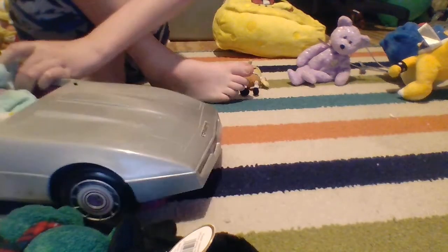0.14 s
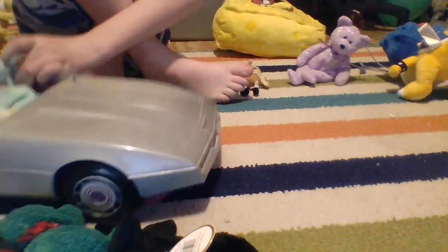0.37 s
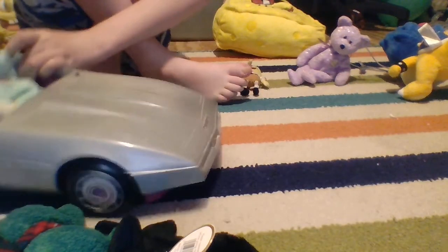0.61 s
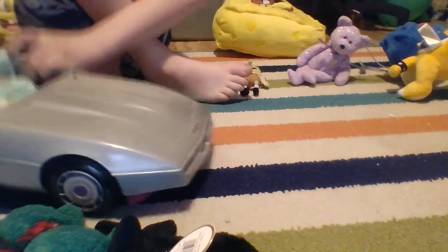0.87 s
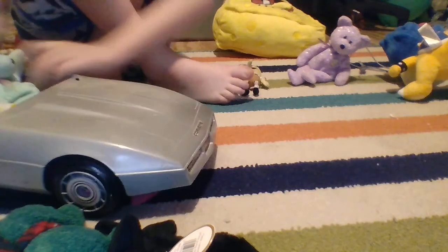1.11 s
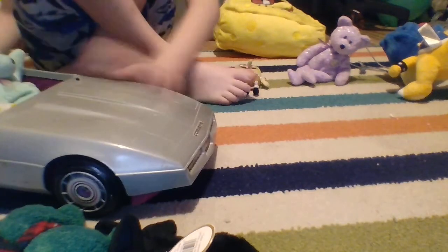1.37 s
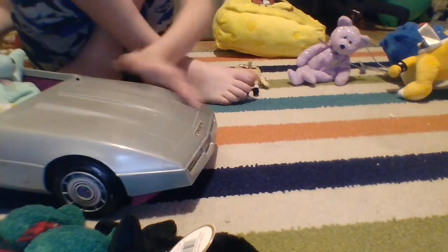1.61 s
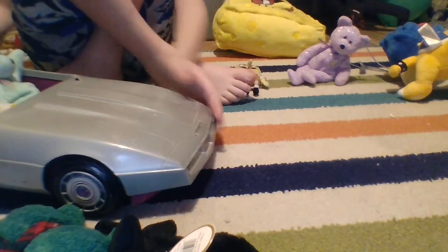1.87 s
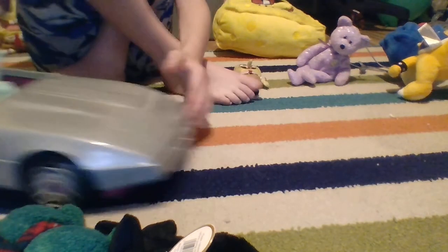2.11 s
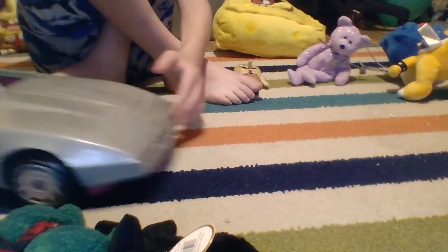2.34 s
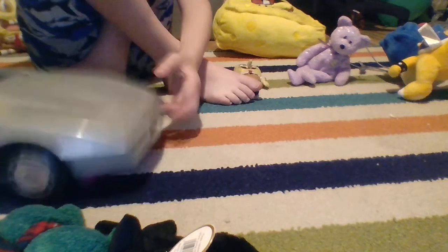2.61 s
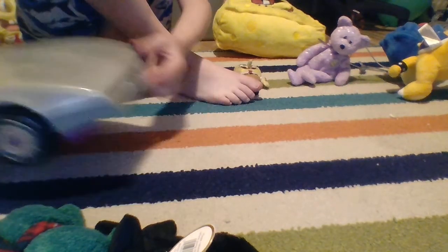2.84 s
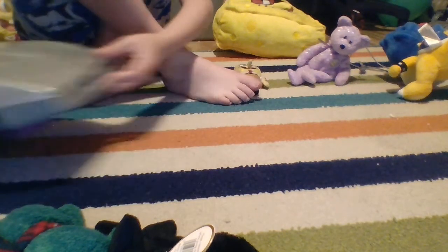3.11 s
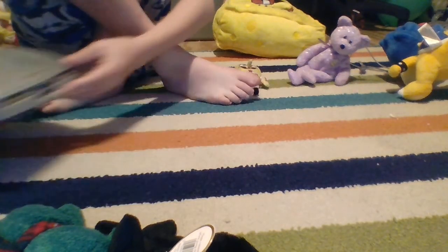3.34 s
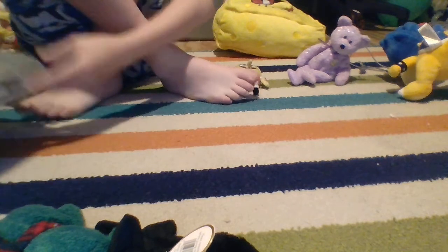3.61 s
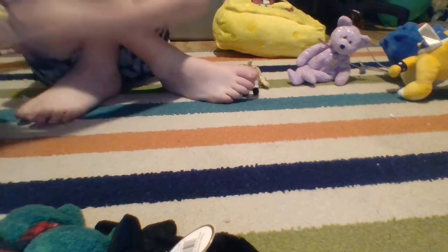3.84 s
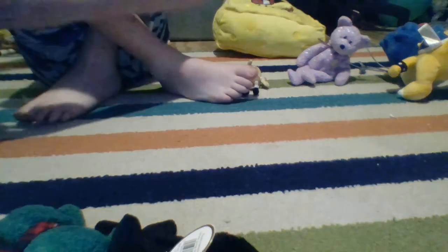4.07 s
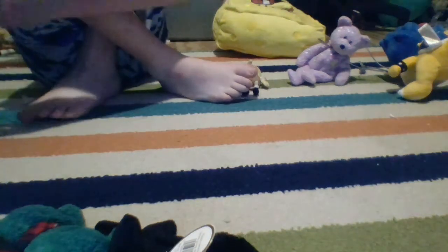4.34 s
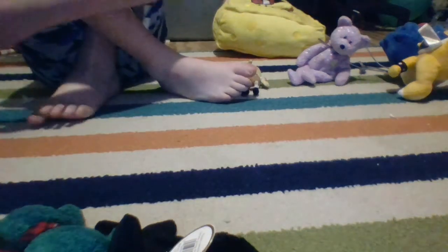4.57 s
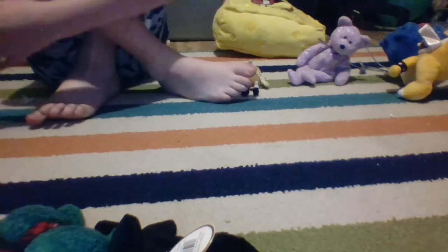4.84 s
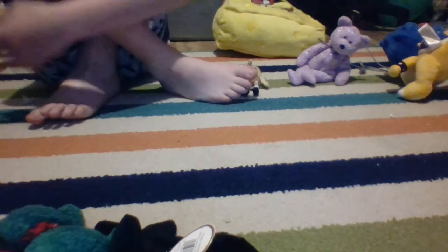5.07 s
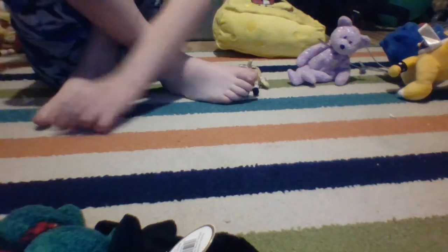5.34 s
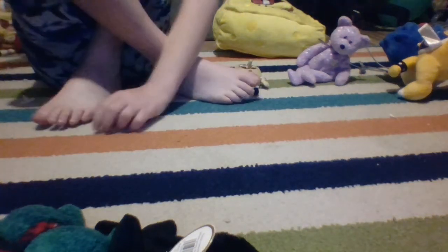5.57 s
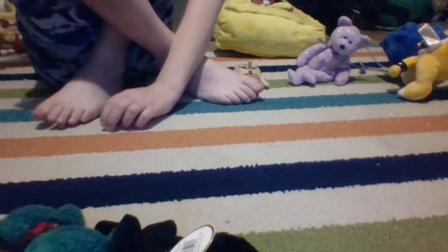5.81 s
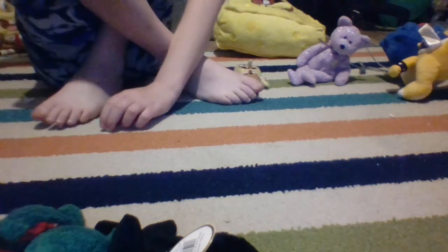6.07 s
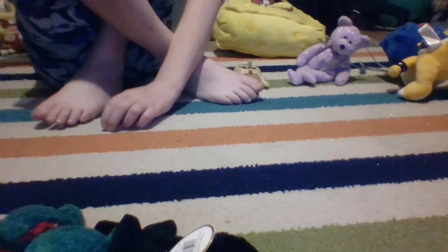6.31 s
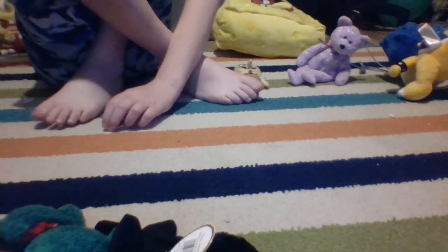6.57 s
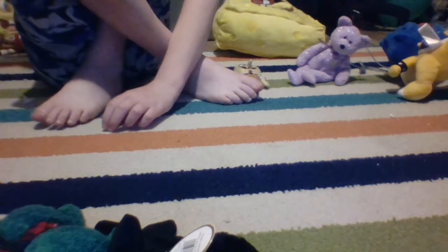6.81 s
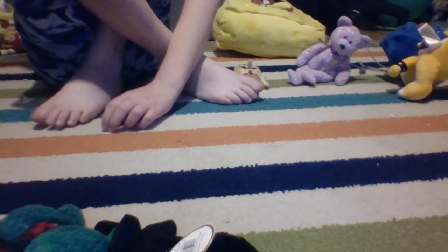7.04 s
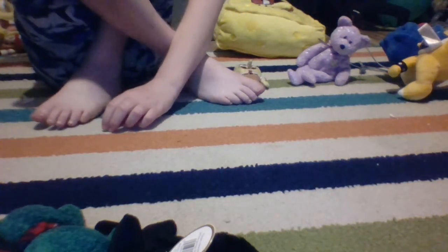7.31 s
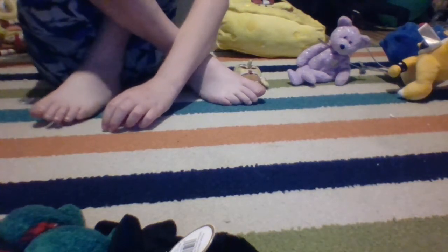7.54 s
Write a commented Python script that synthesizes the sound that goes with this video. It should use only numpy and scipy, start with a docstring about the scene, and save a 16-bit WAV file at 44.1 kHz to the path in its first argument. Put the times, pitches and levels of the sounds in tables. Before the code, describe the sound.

A quiet small room, heard close in stereo, with faint hum and hiss. From 0 to 0.45 s a hollow plastic toy car rolls over carpet: grainy low-mid rumble, rubbing, a thin high wheel whirr and tiny squeaks. At 0.47-0.62 s come rapid hard hollow knocks with a brushy scrape, then a louder clatter at 0.8-0.85 s. From 1 to 2.6 s it is nearly quiet: faint finger brushes and soft low puffs of moving air. Around 2.7-3.03 s the lifted car clacks several times. Slight rubs follow, dull knocks at 3.8 s, then strong clacks at 4.2-4.3 s, a rough stuttering creak at 4.4-4.57 s, and sharp clacks at 4.67-4.75 s. Light taps thin out to 5.5 s, with small bumps near 6-6.2 s. After near silence, soft hollow knocks, a faint squeak and brushing close 7.25-7.6 s.

```python
"""Wheels whirr and plastic rubs as a hollow toy car rolls in over carpet in a quiet room; hard knocks follow.
The car is lifted, turned in the hands and set down: blows and rubs excite decaying modes of its shell,
stick-slip creaks and squeaks, and strokes on the pile hiss as dense random grains.
Quick moves puff turbulent air at two close microphone ports, over faint hum and hiss."""
import sys
import numpy as np
from scipy import signal
from scipy.fft import rfft, irfft
from scipy.io import wavfile
from scipy.ndimage import uniform_filter1d

SR = 44100
rng = np.random.default_rng(int(sys.argv[2]) if len(sys.argv) > 2 else 0)


def linear_from_db(decibels):
    """Turn decibels (scalar or array-like) into linear amplitude factors; 0 gives 1."""
    return 10 ** (np.asarray(decibels, float) / 20)


def file_out(sig):
    """Save sig as 16-bit WAV at sys.argv[1]."""
    # one column per channel
    cols = np.atleast_2d(sig).T
    # limit, then scale
    lim = np.clip(cols, -1, 1)
    pcm = np.round(lim * 32767).astype(np.int16)
    wavfile.write(sys.argv[1], SR, pcm)


N = 338511  # length in samples

# Modes of the plastic shell. Each row: frequency in Hz, relative level in dB, 60 dB decay time in s.
SHELL_MODES = [(180, -9, 0.079), (325, -5, 0.044), (372, 0, 0.035), (460, -1, 0.068), (540, 1.5, 0.036),
               (623.4, 1.5, 0.053), (705, -6.5, 0.039), (819.4, -4, 0.026), (972, 1, 0.026),
               (1042.6, -6.5, 0.054), (1199, -2, 0.047), (1311, -3, 0.031), (1367, -3.5, 0.033),
               (1777, 3.5, 0.015), (2027, 0.5, 0.015), (2264, 7, 0.0098), (2610, 4, 0.0098),
               (3400, -1.5, 0.022), (3930, -1.5, 0.011), (4450, -3, 0.014), (5295, -3, 0.006)]
MIDDLE_HZ, UPPER_HZ = 880, 1550  # edges between the modes of large, small and tiny panels
STEP = 64  # samples between envelope values


def evened(x):
    """Normalizes a signal to unit rms."""
    return x / np.sqrt(np.mean(x ** 2) + 1e-20)


def read(points, hz):
    """Interpolates a table of (Hz, value) along a logarithmic frequency axis."""
    f, value = np.transpose(points)
    return np.interp(np.log(hz + 1), np.log(f + 1), value)


def curves(rows):
    """Interpolates each column of a time table linearly, one value a sample."""
    s, *columns = np.transpose(rows)
    return [np.interp(np.arange(N) / SR, s, column) for column in columns]


def add(mix, s, sound):
    """Superposes a sound on the mix from time s in seconds."""
    part = mix[round(s * SR):][:len(sound)]
    part += sound[:len(part)]


def coloured(x, points):
    """Filters linearly by a gain table of (Hz, dB), without phase shift."""
    gain = linear_from_db(read(points, np.fft.rfftfreq(x.shape[-1], 1 / SR)))
    return irfft(rfft(x) * gain, x.shape[-1])


def grains(size, per_s, spread_db):
    """Random impulses of either sign at a mean rate, a few of them large."""
    height = linear_from_db(spread_db * np.minimum(rng.exponential(1, size), 4))
    return height * (rng.random(size) < per_s / SR) * rng.choice([-1., 1.], size)


def spread(pair):
    """Partial correlation of a wide source: the right port hears partly other grains than the left."""
    return np.array([pair[0], 0.43 * pair[0] + 1.2 * pair[1]])


def swells(rows, bend):
    """Power envelope of each row: 1 at its moment, 20 dB down one rise before and one fall after."""
    s, rise, fall = np.transpose(rows)[:3, :, None]
    t = np.arange(0, N + STEP, STEP) / SR - s
    return linear_from_db(-2 * 20 * (abs(t) / np.where(t < 0, rise, fall)) ** bend)


def smooth(values):
    """Interpolates envelope values linearly to one a sample."""
    return np.interp(np.arange(N) / STEP, np.arange(len(values)), values)


def ring(hz, db, t60):
    """Impulse response of one damped mode; the contact lasts a cycle or two."""
    t = np.arange(4000) / SR
    contact = 1 - np.exp(-(t * hz * 0.71) ** 2)
    return linear_from_db(db - 60 * t / t60) * np.sin(2 * np.pi * hz * t) * contact


def panel_size(hz):
    """Modal frequency tells panel size: 0 large, 1 small, 2 tiny."""
    return np.searchsorted([MIDDLE_HZ, UPPER_HZ], hz)


def near(hz, panel_hz, slope_db):
    """Modal coupling in dB, weaker away from the panel touched; slope in dB per octave."""
    return -np.minimum(slope_db * abs(np.log2(hz / panel_hz)), 21)


def blow_coupling(hz, panel_hz, other_db, crack_db, soft):
    """A contact's hardness sets its spectrum: cushioned blows leave the upper modes weak (result in dB)."""
    dull_db = -4 * soft ** 2 * np.log2(2 * hz / UPPER_HZ)
    upper_db = other_db + 0.25 * crack_db + 3.5 + dull_db
    struck_db = near(hz, panel_hz, slope_db=41 if panel_hz < UPPER_HZ else 28)
    struck = panel_size(hz) == panel_size(panel_hz)
    return np.select([struck, hz > UPPER_HZ], [struck_db, upper_db], other_db)


def knocks():
    """Impact excitation: a blow and the loose parts chattering after it ring the modes; a crack on top."""
    # Each row: nominal contact time in seconds, peak level in dB, pitch in Hz of the panel struck,
    # relative level of the other panels in dB, crack level in dB.
    blows = [(0.47, -21, 479, -12, -35.5), (0.489, -26, 516, -10.5, -38), (0.543, -22, 403, -8.5, -22),
             (0.571, -21.5, 488, -17.5, -60), (0.594, -19, 497, -6, -40), (0.602, -17, 180, -28, -60),
             (0.618, -18, 555, -6, -18), (0.711, -36, 546, -20, -54.5), (0.785, -22, 567, -6, -59),
             (0.792, -23, 3400, -10, -20), (0.812, -16, 1777, -9.5, -22), (0.829, -21.5, 2264, -12, -30),
             (0.833, -12.5, 490, -2, -20.5), (0.848, -25, 540, -15.5, -30),
             (0.952, -31.5, 2550, -11.5, -29.5), (1.297, -62, 1200, -14, -41.5),
             (1.533, -47, 1460, -21, -59.5), (1.867, -48, 1190, -15, -83), (1.954, -42, 594, -29, -63),
             (2.163, -42.5, 1415, -20, -54.5), (2.473, -49.5, 425, -21.5, -69.5),
             (2.695, -25, 657, -10, -45), (2.695, -25.5, 3400, -30, -21), (2.839, -26, 643, -12.5, -22.5),
             (2.859, -20, 3820, -27.5, -17), (2.875, -34.5, 543, 7, -41), (2.929, -46, 590, -18, -59.5),
             (2.965, -22.5, 2264, -8, -49.5), (2.995, -16.5, 478, -9, -25.5), (3.018, -17, 634, -5, -32.5),
             (3.031, -19.5, 808, -27, -39), (3.355, -43.5, 664, -52, -52.5), (3.821, -28.5, 508, -1.5, -52),
             (3.838, -29, 540, -4, -47.5), (4.114, -49.5, 460, -18, -29), (4.152, -31.5, 528, -10, -70),
             (4.223, -13.5, 1925, -9.5, -25.5), (4.249, -13, 518, -15.5, -26.5),
             (4.283, -26.5, 1020, 2, -43), (4.328, -34, 1370, -12.5, -47), (4.363, -31.5, 473, -8.5, -51),
             (4.64, -32, 611, -8.5, -65.5), (4.667, -17, 1777, -12.5, -10),
             (4.687, -17.5, 508, -4.5, -23.5), (4.732, -17.5, 543, -9, -33),
             (4.775, -24.5, 460, -13, -44.5), (4.871, -32.5, 509, -23.5, -50), (4.905, -31, 460, -4, -25.5),
             (5.008, -45, 467, -32, -79), (5.087, -41, 480, -21.5, -74), (5.13, -36.5, 522, -22, -52.5),
             (5.2, -46.5, 490, -28, -72), (5.262, -33, 570, -23.5, -50.5), (5.333, -38.5, 558, -18.5, -68),
             (5.428, -43, 540, -20, -76), (5.475, -44.5, 500, -11.5, -67.5), (5.512, -39, 460, -33, -58),
             (5.789, -42, 545, -28, -52.5), (5.827, -39, 487, -45, -74.5), (5.96, -41, 460, -28, -75),
             (5.988, -30, 1210, -8.5, -56.5), (6.037, -27, 498, -8.5, -29), (6.077, -32.5, 585, -9.5, -59),
             (6.184, -28.5, 568, -27.5, -63), (6.219, -33.5, 603, -37, -61), (6.586, -39.5, 460, -9.5, -97),
             (7.133, -49.5, 474, -17.5, -48.5), (7.265, -41.5, 479, -28, -59),
             (7.438, -37.5, 940, -19.5, -65), (7.473, -29.5, 613, -23, -47),
             (7.514, -26, 540, -16.5, -54.5), (7.53, -21.5, 520.4, -16, -45.5),
             (7.552, -25.5, 540, -7.5, -46), (7.601, -22.5, 518.8, -20.5, -43)]
    cushion_s, cushion_db = 0.0019, -36.5  # base rise time; it doubles with the crack this far under the blow
    body, crack, hz = np.zeros(N), np.zeros((2, N)), np.transpose(SHELL_MODES)[0]
    t = np.arange(3000) / SR
    for s, db, panel_hz, other_db, crack_db in blows:
        soft = (crack_db - db) / cushion_db
        lean_db = blow_coupling(hz, panel_hz, other_db, crack_db - db, soft)
        lean_db = lean_db + 2.6 * rng.standard_normal(len(hz))  # uneven each time
        lean = linear_from_db(lean_db) * rng.choice([-1, 1], len(hz))

        loose = np.clip(soft, 0, 1)
        hits = (rng.random(len(t)) < 550 / SR) * rng.standard_normal(len(t))
        chatter = (0.1 + 0.26 * loose) * hits * np.exp(-(t / (0.0087 + 0.016 * loose)) ** 2)
        chatter[0] = 1  # the blow itself

        # the hands bend the shell, shifting its modes
        grip = 1 + (0.037 + 0.016 * panel_size(hz)) * rng.standard_normal(len(hz))
        rings = np.array([ring(f * g, mode_db, t60) for (f, mode_db, t60), g in zip(SHELL_MODES, grip)])
        sound = signal.fftconvolve(chatter, lean @ rings)
        rise_s = cushion_s * 2 ** soft
        sound[:len(t)] *= 1 - np.exp(-(t / rise_s) ** 0.8)  # the pile cushions the blow
        s = s - 1.5 * max(rise_s - cushion_s, 0)  # a soft contact begins earlier
        add(body, s, linear_from_db(db) * sound / abs(sound).max())

        snap = (1 - np.exp(-t / (0.14 * rise_s))) * np.exp(-t / 0.0024)
        snap = abs(signal.fftconvolve(abs(chatter) ** 1.8, snap)[:len(t)])
        after = 0.17 * (1 - np.exp(-t / 0.0015)) * np.exp(-t / 0.027)
        hiss = spread(rng.standard_normal((2, len(t))))
        add(crack.T, s, (linear_from_db(crack_db) * (snap + after) * hiss).T)
    return body, crack


def rubs():
    """Friction as dense random impacts: axles and fingers tick into the shell, most into panels touched."""
    # Each row: moment, rise and fall in seconds, level in dB, pitch in Hz of the panel rubbed.
    rub_rows = [(0.073, 0.11, 0.1, -39.5, 707), (0.021, 0.28, 0.11, -36.5, 376),
                (.145, 0.014, 0.21, -33.5, 703), (.19, 0.17, 0.077, -39.5, 438),
                (.42, 0.11, 0.12, -41, 460), (0.641, 0.17, 0.13, -34.5, 582),
                (.645, 0.043, 0.11, -39, 1114), (1.259, 0.081, 0.1, -69, 1133),
                (2.501, 0.27, 0.24, -64, 594), (2.619, 0.059, 0.034, -53.5, 625),
                (2.63, 0.066, 0.12, -54, 1040), (3.27, 0.079, 0.16, -66.5, 2840),
                (3.41, 0.18, 0.12, -49, 676), (3.415, 0.066, 0.083, -55.5, 1296),
                (4.278, 0.14, 0.06, -39, 502), (4.3, 0.23, 0.17, -42, 1116), (4.48, 0.12, 0.088, -41, 461),
                (4.788, 0.19, 0.094, -35.5, 494), (5.729, 0.043, 0.044, -54.5, 462),
                (5.839, 0.061, 0.091, -48.5, 540), (6.121, 0.23, 0.085, -50.5, 542),
                (6.124, 0.4, 0.19, -60, 960), (6.4, 0.42, 0.23, -66.5, 640), (6.611, 0.038, 0.05, -44, 476),
                (7.52, 0.11, 0.38, -36, 582), (7.56, 0.095, 0.18, -39, 1110),
                (7.59, 0.12, 0.27, -53.5, 2440),]
    across_db = -28.5  # coupling per step of panel size
    above_db = -25  # coupling from small panels up to tiny ones
    out, shape = np.zeros(N), swells(rub_rows, bend=1.42)
    bumps = evened(grains(N, per_s=390, spread_db=2.5))  # felt by all panels at once
    rub_db, panel_hz = np.transpose(rub_rows)[3:]
    for hz, db, t60 in SHELL_MODES:
        step = panel_size(hz) - panel_size(panel_hz)
        touched_db = near(hz, panel_hz, slope_db=60.5)
        upward = (step == 1) & (hz > UPPER_HZ)
        lean_db = np.select([step == 0, upward], [touched_db, above_db], across_db * abs(step))
        level = smooth(np.sqrt(linear_from_db(rub_db + lean_db) ** 2 @ shape))
        own_ticks = evened(grains(N, per_s=1300, spread_db=5.0))
        ticks = (0.32 * bumps + 0.9 * own_ticks) * level
        mode = ring(hz, 0, t60)
        add(out, 0, linear_from_db(db) * signal.oaconvolve(ticks, mode / np.linalg.norm(mode)))
    return out


def rolling():
    """Resonant filtering: bumps of the pile excite a hollow resonance that drifts as the load shifts."""
    # The car rolling in. Each row: time in seconds, pitch in Hz, level in dB.
    path = [(0, 734, -29), (.07, 722, -40.5), (.125, 780, -51), (.137, 790, -36.5), (.24, 850, -46),
            (.34, 910, -41), (.42, 800, -44), (.47, 760, -90.5)]
    width_hz = 140  # bandwidth of each of the two equal poles
    hz, db = curves(path)
    turn = np.exp(2j * np.pi * np.cumsum(hz) / SR)
    r = np.exp(-np.pi * width_hz / SR)
    low = grains(N, per_s=800, spread_db=3.0) / turn  # shifted down so that the resonance lies at 0 Hz
    resonance = signal.lfilter([1], np.convolve([1, -r], [1, -r]), low)
    return linear_from_db(db) * evened((turn * resonance).real)


def wheels():
    """Band-limited random impulses: wheels whirr with a thin high hiss; its spectrum is set by the table below."""
    # Humps of the spectrum. Each row: centre in Hz, half-width in Hz to 1/e, relative level in dB.
    humps = [(7910, 280, 4), (9880, 1500, 3), (13800, 950, 2.5), (15700, 600, -5.5)]
    # The car coasting in. Each row: time in seconds, level in dB.
    coast = [(0, -47.5), (.3, -45), (.42, -51.5), (.5, -74), (.56, -140)]
    f = np.fft.rfftfreq(N, 1 / SR)
    shape = sum(linear_from_db(db) * np.exp(-((f - hz) / width) ** 4) for hz, width, db in humps)
    hiss = rfft(spread(grains((2, N), per_s=4200, spread_db=5.0)))
    return linear_from_db(curves(coast)[0]) * evened(irfft(hiss * shape, N))


def creak():
    """Stick-slip of a finger dragged over the shell: each slip rings two panels and spits a little hiss."""
    # Each row: time in seconds, mean slips per second, level in dB.
    drag = [(4.409, 95, -40.5), (4.42, 100, -33.5), (4.455, 155, -30.5), (4.485, 150, -33.5),
            (4.505, 200, -31.5), (4.535, 200, -34), (4.575, 220, -59)]
    # Panels rung. Each row: pitch in Hz, relative level in dB.
    panels = [(1370, -1.5), (2040, -1)]
    rate, db = curves(drag)
    t = np.arange(N) / SR
    jitter = evened(uniform_filter1d(rng.standard_normal(N), size=300))
    rate = rate * (t > drag[0][0]) * (t < drag[-1][0]) * (1 + 0.027 * jitter)
    slips = np.diff(np.floor(np.cumsum(rate) / SR), prepend=0)
    slips = slips * linear_from_db(db + 2.8 * rng.standard_normal(N))
    body = sum(ring(hz, mode_db + panel_db + near(hz, panel_hz, slope_db=70.5), t60 * 1.11)
               for hz, mode_db, t60 in SHELL_MODES for panel_hz, panel_db in panels)
    spit = signal.oaconvolve(abs(slips), np.exp(-t[:600] / 0.0011))[:N]
    hiss = linear_from_db(3) * spit * spread(rng.standard_normal((2, N)))
    return signal.oaconvolve(slips, body)[:N], hiss


def squeaks():
    """Stick-slip of plastic on plastic at an axle: a breathy tone, its frequency and amplitude modulated."""
    # Each row: start in seconds, level in dB, length in seconds, mean pitch in Hz.
    tones = [(0.288, -57.5, 0.029, 2204), (0.326, -60, 0.036, 2150), (0.391, -54.5, 0.046, 2145),
             (4.906, -46, 0.038, 3880), (6.203, -69, 0.052, 3830), (6.464, -76.5, 0.046, 3740),
             (6.605, -69.5, 0.041, 3820), (6.649, -65, 0.029, 3900), (7.254, -54, 0.098, 994),
             (7.311, -52.5, 0.085, 3920), (7.327, -55, 0.13, 1000)]
    out = np.zeros(N)
    for s, db, length, hz in tones:
        waver = evened(uniform_filter1d(rng.standard_normal(round(length * SR)), size=120))
        tone = np.sin(2 * np.pi * np.cumsum(hz * (1 + 0.035 * waver)) / SR)
        add(out, s, linear_from_db(db) * tone * (1 + 0.9 * waver[::-1]) * np.hanning(len(tone)))
    return out


def strokes():
    """Powers of independent sources add: level of the brushing, and brightness in dB of the loudest strokes."""
    # Hands and wheels on the pile. Each row: moment, rise and fall in seconds, level in dB, brightness in dB.
    stroke_rows = [(.51, 0.15, 0.22, -45.5, -1), (0.626, 0.068, 0.058, -28.5, 0.5),
                   (.84, 0.16, 0.075, -42, -7), (.97, 0.082, 0.082, -51, -4), (1.058, 0.032, 0.17, -51, 1),
                   (1.303, 0.012, 0.17, -48.5, 17), (1.538, 0.037, 0.15, -46, 12),
                   (2.07, 0.2, 0.27, -60, 0), (2.616, 0.039, 0.24, -50, 0.5), (2.9, 0.1, 0.18, -55, 6.5),
                   (3.048, 0.23, 0.032, -51.5, -11), (3.42, 0.15, 0.22, -49, -5),
                   (3.549, 0.14, 0.068, -48, 1), (4.118, 0.012, 0.14, -41.5, 6.5),
                   (4.27, 0.14, 0.29, -38, -2.5), (4.513, 0.12, 0.027, -34, 3),
                   (4.71, 0.092, 0.15, -42.5, 2.5), (4.9, 0.5, 0.97, -60, 1),
                   (5.249, 0.053, 0.28, -51.5, 6.5), (5.46, 0.08, 0.18, -51, 5.5),
                   (5.75, 0.79, 0.62, -63.5, 4), (6.069, 0.11, 0.053, -48, -5),
                   (7.49, 0.052, 0.29, -39.5, 9.5), (7.67, 0.27, 0.11, -39, -1)]
    db, bright_db = np.transpose(stroke_rows)[3:]
    power = linear_from_db(db)[:, None] ** 2 * swells(stroke_rows, bend=1.5)
    total = power.sum(0) + linear_from_db(-70) ** 2  # faint rustle between the strokes
    return smooth(np.sqrt(total)), smooth(bright_db @ power / total)


def brushing():
    """Amplitude-modulated grain noise: the pile hisses finely, catching unevenly."""
    catch = evened(uniform_filter1d(rng.standard_normal(N), size=200))
    hiss = evened(spread(grains((2, N), per_s=16000, spread_db=2.5)))
    return strokes()[0] * linear_from_db(1.5 * catch) * hiss


def sheen(x):
    """Time-varying spectral tilt: skin on smooth plastic is bright, the shell on the pile is dull."""
    # Spectrum of brushing and cracks. Each row: frequency in Hz, density in dB per Hz.
    spectrum = [(1200, -22), (3000, -6.5), (5000, -8.5), (7000, -6.5), (9000, -10), (11000, -10.5),
                (13000, -7), (15800, 0), (16400, -38.5)]
    x, bright_db = coloured(x, spectrum), strokes()[1]
    z = signal.stft(x, nperseg=256)[2]
    patches = uniform_filter1d(rng.standard_normal(z.shape[1:]), size=2, axis=0)
    patches = evened(uniform_filter1d(patches, size=30, axis=1))
    x = signal.istft(z * linear_from_db(4.2 * patches), nperseg=256)[1][:, :N]  # some bands stand out for a moment
    dull = coloured(x, [(8000, 0.0), (12000, -33.5)])
    return linear_from_db(-bright_db / 2) * dull + linear_from_db(bright_db / 2) * (x - dull)


def room(x):
    """Reverberation by sparse random echoes, each band decaying at its own speed; bass alike at both ports."""
    # Each row: frequency in Hz, 60 dB decay time in seconds.
    decay = [(300, 0.19), (1000, 0.18), (4000, 0.13), (14000, 0.031)]
    taps = np.zeros((2, SR // 2))
    at = np.arange(120, SR // 2 - 20, 20)
    at = at + rng.integers(0, 20, (2, len(at)))
    np.put_along_axis(taps, at, rng.choice([-1., 1.], at.shape), 1)
    hz, t, z = signal.stft(taps, SR, nperseg=256)
    same = np.clip(read([(600, 0.97), (2000, 0.76), (5000, 0.098)], hz), 0, 1)[:, None]
    z[1] = same * z[0] + np.sqrt(1 - same ** 2) * z[1]
    tail = signal.istft(z * linear_from_db(-60 * t / read(decay, hz)[:, None]), SR, nperseg=256)[1]
    return signal.fftconvolve(x[None], tail / np.linalg.norm(tail[0]), axes=1)[:, :N]


def puffs():
    """Turbulent pressure as low-frequency noise, lumpy in level and unrelated at the two ports."""
    # Gusts of moving air. Each row: moment, rise and fall in seconds, left level in dB, right level in dB.
    gusts = [(.12, 0.45, 0.22, -68.5, -56.5), (.76, 0.25, 0.15, -75, -54), (1.17, 0.11, 0.18, -74.5, -47),
             (1.4, 0.15, 0.15, -39, -51.5), (1.89, 0.026, 0.066, -42.5, -73),
             (2.049, 0.041, 0.055, -35, -66), (2.15, 0.069, 0.13, -33.5, -47), (3.62, 0.16, 0.32, -78, -49),
             (4.25, 0.19, 0.12, -56, -56), (4.6, 0.24, 0.13, -83.5, -48), (5.659, 0.038, 0.072, -67.5, -44)]
    spectrum = [(12, -49.0), (28, 4.0), (55, -6.0), (90, -6.5), (200, -61.0)]
    air = coloured(rng.standard_normal((2, N)), spectrum)
    calm = linear_from_db(-73) ** 2  # air between the gusts
    power = linear_from_db(np.transpose(gusts)[3:]) ** 2 @ swells(gusts, bend=2.5) + calm
    return np.array([smooth(np.sqrt(port)) for port in power]) * evened(air)


def hush():
    """Noise of set coherence between the ports: distant house hum, and the hiss of each microphone."""
    # Quiet room. Each row: frequency in Hz, density in dB per Hz before scaling.
    spectrum = [(12, -22), (20, -3), (60, -31), (111, -7.5), (178, -9), (287, -10.5), (380, -24),
                (414, -13.5), (1380, -22.5), (1990, -26.5), (7860, -49), (16300, -36.5)]
    # Each row: frequency in Hz, left-right correlation (negative is opposed).
    likeness = [(60, 0.52), (380, 0.94), (2380, -0.58), (15000, -0.66)]
    left, other = rfft(rng.standard_normal((2, N)))
    hz = np.fft.rfftfreq(N, 1 / SR)
    same = np.clip(read(likeness, hz), -1, 1)
    pair = np.array([left, same * left + np.sqrt(1 - same ** 2) * other])
    return linear_from_db(-69) * evened(irfft(pair * linear_from_db(read(spectrum, hz)), N))


def scene():
    """Arrival by path length: the toy reaches the left port first, then the right, then by way of the walls."""
    blows, cracks = knocks()
    slips, spits = creak()
    toy = blows + slips + rubs() + rolling() + squeaks() + wheels()
    toy = toy + sheen(cracks + spits + brushing())
    direct = np.array([linear_from_db(1.08) * toy[0], np.roll(toy[1], 4)])  # the right port lags by 4 samples
    bass_cut = [(110, -40.0), (180, -13.5), (340, -1.5)]  # the toy's sound thins out steeply below about 300 Hz
    return coloured(direct + linear_from_db(-7.5) * room(toy[0]), bass_cut) + puffs() + hush()


def low_pass(x):
    """Removes everything above the highest recorded frequency."""
    return signal.sosfilt(signal.butter(12, 16960, fs=SR, output="sos"), x)


def record(dry):
    """Takes the superposed sound at the two ports as the finished mix."""
    return low_pass(dry)


dry = scene()
out = record(dry)
file_out(out)
```